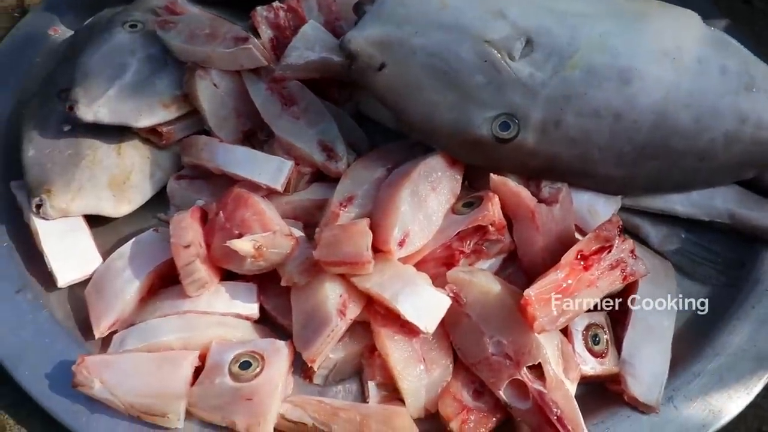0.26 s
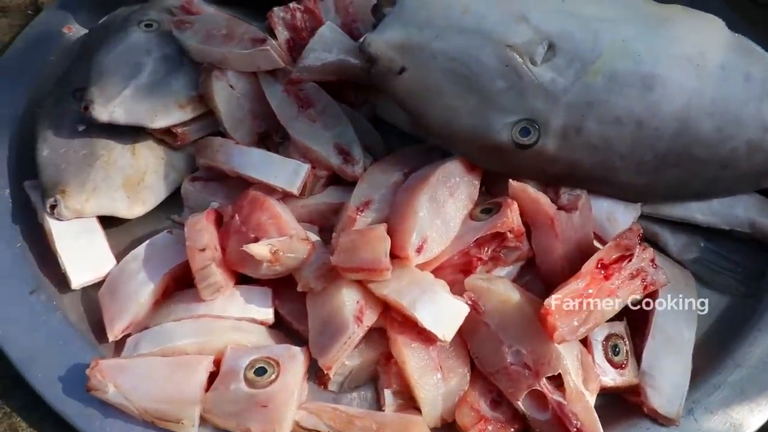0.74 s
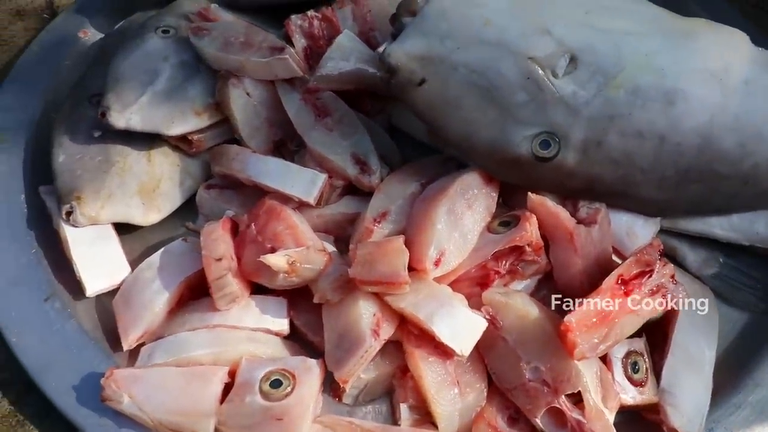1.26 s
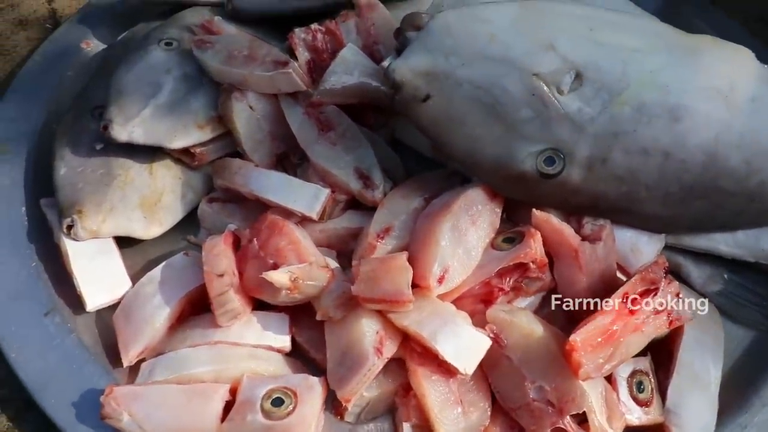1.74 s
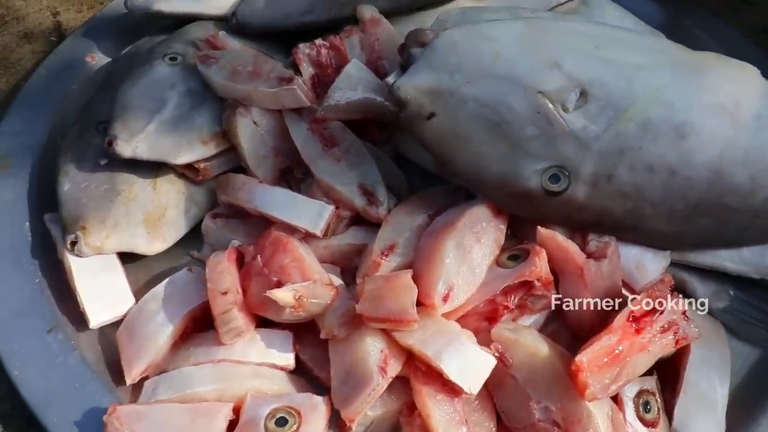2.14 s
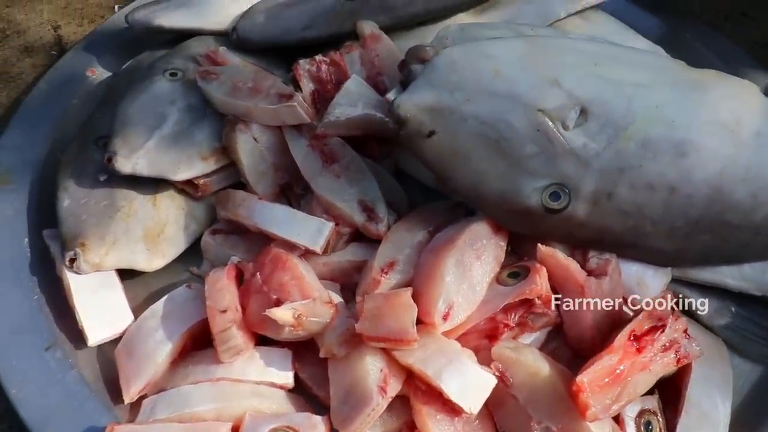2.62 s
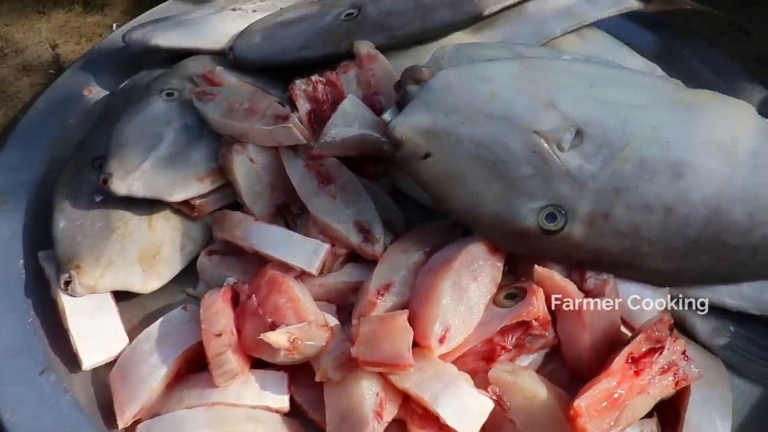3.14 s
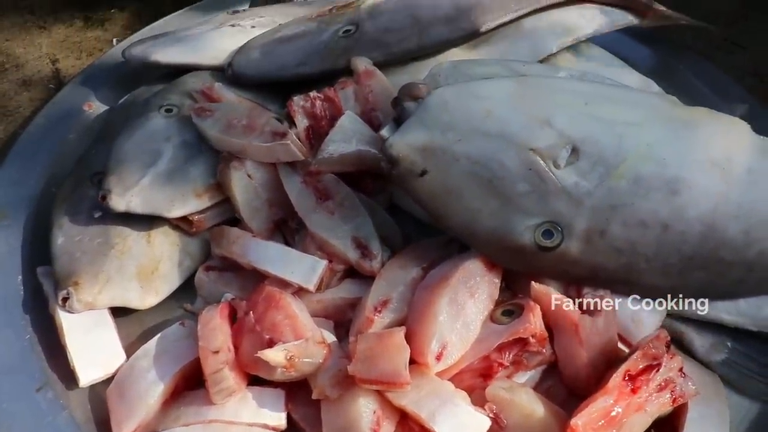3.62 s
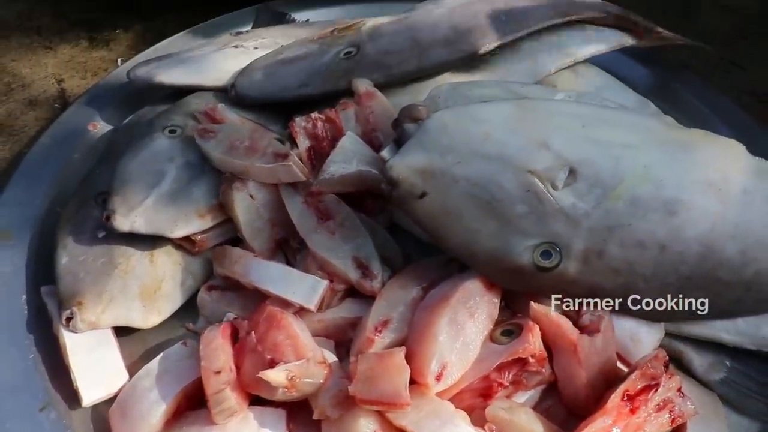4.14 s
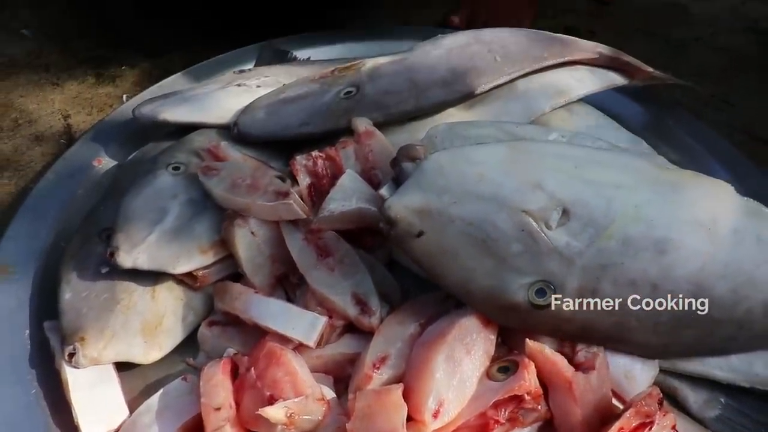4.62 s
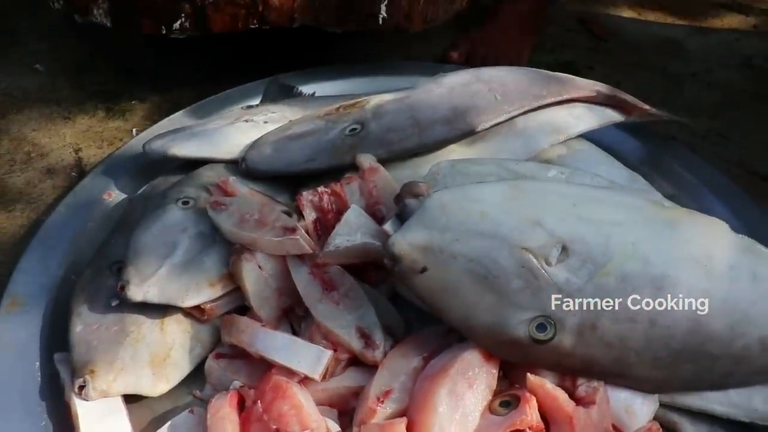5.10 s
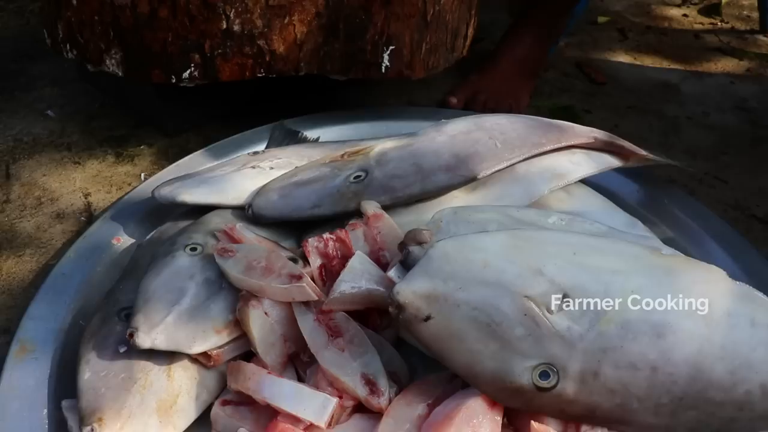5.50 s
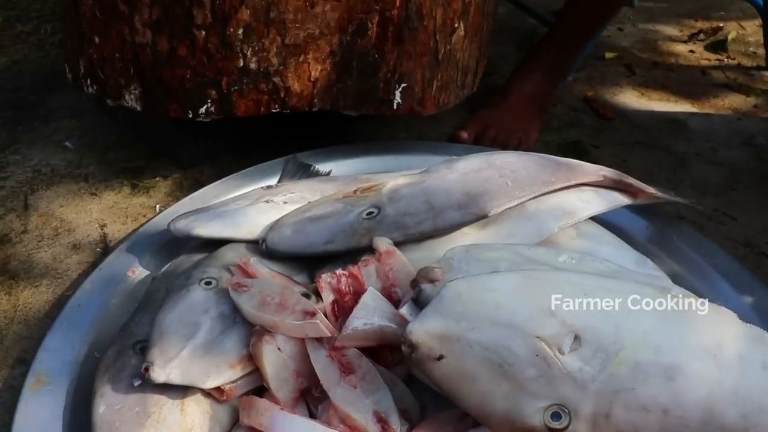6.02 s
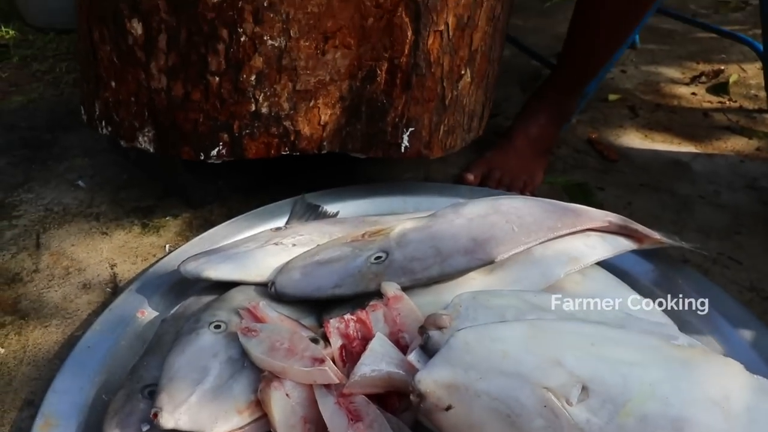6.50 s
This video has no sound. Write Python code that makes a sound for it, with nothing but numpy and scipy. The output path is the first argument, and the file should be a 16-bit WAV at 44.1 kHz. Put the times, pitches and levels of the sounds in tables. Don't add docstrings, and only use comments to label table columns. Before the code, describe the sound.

Outdoors, bright double chirps and lower warbled whistles ring over short blade scrapes on stone, abrupt knocks on wood, and soft breeze.

```python
import sys
import numpy as np
from scipy import signal
from scipy.fft import rfft, irfft
from scipy.io import wavfile
from scipy.ndimage import uniform_filter1d

SR = 44100
rng = np.random.default_rng(int(sys.argv[2]) if len(sys.argv) > 2 else 0)


def invert_db(x):
    u = np.asarray(x, float) / 20
    return 10 ** u


def generate_wav(signal):
    frames = np.transpose(np.atleast_2d(signal))
    scaled = np.clip(frames, -1, 1) * 32767
    pcm = np.round(scaled).astype(np.int16)
    wavfile.write(sys.argv[1], SR, pcm)


N = 297662

# f/Hz, density/dB per Hz
AIR_SPECTRUM = [(18, -38), (30, 6), (178, -12), (470, -19.5), (5370, -30), (6120, -25.5), (7170, -36),
                (8840, -36.5), (15700, -39.5)]
# f/Hz, width/Hz, level/dB
INSECT_BANDS = [
    (6200, 230, -82),
    (8900, 270, -71),
    (925, 51, -74.5),
    (52.6, 42, -66.5),
    (117, 4.6, -68),
    (165.7, 3.1, -65.5),
]

# t/s, length/s, f/Hz, level/dB
CHEEP_NOTES = [(0.0, 0.066, 3970, -51.5), (1.432, .12, 4040, -34), (1.8, 0.077, 4017, -31.5),
               (2.39, 0.11, 3940, -42), (2.57, .08, 3890, -34.5), (2.875, 0.087, 3966, -29),
               (3.4, .07, 3850, -40.5), (6.292, .12, 4268, -28.5)]
TWITTER_NOTES = [(.555, 0.03, 3420, -62), (.875, 0.057, 2940, -54), (1.365, 0.0089, 2780, -67),
                 (1.385, 0.011, 2800, -65)]
SQUEAK_NOTES = [(6.44, .1, 2400, -42.5)]
CLUCK_NOTES = [(2.47, 0.026, 2700, -46), (4.905, .02, 3906, -46.5), (5.397, 0.023, 3540, -43.5)]
COO_NOTES = [(1.95, 0.14, 649, -52.5), (2.88, 0.069, 593.6, -48), (2.955, 0.028, 771, -44),
             (3.28, 0.054, 576, -46.5), (6.47, 0.13, 691.5, -45)]
WARMUP_NOTES = [(3.0, 0.069, 929.3, -40.5), (3.12, .125, 1291, -29)]

CHEEP_SHAPE = [(0, .97, -20), (.18, 1, 0), (.5, 1, -8), (1, .99, -28)]
TWITTER_SHAPE = [(0, .97, -14), (.6, 1, 0), (1, .99, -4)]
SQUEAK_SHAPE = [(0, .87, -9), (.12, 1, 0), (.45, 1.01, -10), (1, 1, -27)]
CLUCK_SHAPE = [(0, .92, -8), (.3, 1, 0), (1, 1.05, -8)]
COO_SHAPE = [(0, 1.03, -10), (.3, 1, 0), (.7, .995, -3), (1, 1.01, -12)]
WARMUP_SHAPE = [(0, 1, -4), (.35, 1, 0), (.7, .93, -2), (1, .8, -9)]

# crest t/s, opening f/Hz, dip f/Hz, crest f/Hz, level/dB
WARBLES = [(3.452, 1075, 1080, 1431, -19.5), (3.782, 1290, 1240, 1506, -18),
           (4.12, 1290, 1185, 1519, -20.5), (4.439, 1385, 1265, 1558, -18.5), (5.0, 1450, 1235, 1566, -20),
           (5.752, 1500, 1240, 1598, -16)]
# t/s, first arch f/Hz, dip f/Hz, second arch f/Hz, level/dB
CHIRPS = [(2.489, 2100, 2060, 2300, -18), (2.735, 2650, 2135, 2553, -15.5),
          (2.986, 2725, 2164, 2677, -14.5), (3.255, 2790, 2207, 2756, -14), (3.513, 2738, 2221, 2810, -14),
          (3.735, 2782, 2611, 2735, -13), (3.95, 2834, 2650, 2783, -14), (4.182, 2815, 2627, 2798, -12.5),
          (4.399, 2807, 2812, 2731, -17.5), (4.644, 2845, 2705, 2789, -14.5),
          (4.914, 2536, 2344, 2744, -18), (5.405, 2367, 2346, 2602, -24.5)]
# f/Hz, level/dB
THROAT = [(1500, -14), (1800, -9), (2000, 0.5), (3000, -5.5), (4300, -31.5), (5600, -29.5), (6500, -20.5),
          (8200, -34.5), (9800, -39.5), (11000, -17), (12200, -37.5), (14000, -29), (15000, -50)]

# t/s, wood level/dB, crack level/dB, thud level/dB, burst length/s
KNOCKS = [(0.956, -8.5, -12, -33, 0.0036), (0.9599, 7, 1, -39.5, 0.0065),
          (1.006, -19.5, -32.5, -31, 0.0023), (3.102, -2.5, 1.5, -6, .006), (3.135, -21, -42, -12, 0.0053),
          (3.874, -17, -30.5, -25, 0.0093), (3.962, -30, -19, -50, 0.0028), (4.445, -43, -26, -73, 0.001),
          (4.725, -61, -34, -56, 0.001), (5.86, 0, 3.5, -35, 0.0068), (5.903, -13.5, -45.5, -21, 0.0035),
          (5.931, -18.5, -28.5, -27, 0.0066), (6.019, -36, -40.5, -25, 0.0016)]
# f/Hz, level/dB, t60/s
BLOCK_MODES = [(290, -17.5, 0.065), (387.3, -15.5, 0.066), (790, -8.5, 0.016), (940.6, -0.5, 0.048),
               (1085, -3, 0.014), (1369, -1, 0.027), (1512, -3.5, 0.028), (1980, -11, 0.029),
               (2300, -2.5, 0.01), (2990, -14, .02), (4430, -8.5, 0.016)]
# f/Hz, density/dB per Hz
CRACK_SPECTRUM = [(180, -39.5), (300, -15.5), (582, -20), (895, -6), (2020, -3), (2590, 0), (7220, -9),
                  (11500, -13.5), (15700, -23.5)]
# f/Hz, density/dB per Hz
ECHO_SPECTRUM = [(120, -45.5), (200, -11), (598, -15), (970, -1.5), (1130, -12.5), (1500, -8.5),
                 (1900, -14), (2350, -9.5), (2900, -14.5), (4170, -11.5), (5200, -17), (15700, -28)]

# firmest t/s, rise/s, fall/s, rasp level/dB, weight on the stone level/dB
STROKES = [(1.479, 0.096, .1, -49.5, -4.5), (1.719, 0.1, .16, -45.5, -1), (1.945, 0.036, 0.034, -39, 0),
           (2.0, 0.037, .12, -59.5, -0.5), (2.345, .06, .08, -70.5, -7.5), (2.96, 0.13, .12, -67, 12.5),
           (3.169, 0.066, 0.28, -50.5, 2), (3.57, 0.062, .14, -50.5, 2), (3.89, 0.13, 0.088, -47.5, 2.5),
           (3.955, 0.074, .12, -40.5, 5.5), (4.239, .09, 0.13, -47, 3.5), (4.315, .05, 0.067, -52.5, -6.5),
           (4.41, .04, 0.22, -53, -5), (4.611, 0.055, 0.051, -36.5, -1.5), (4.699, 0.039, 0.07, -45.5, -18),
           (6.36, 0.091, .1, -51, -8.5), (6.46, .05, 0.13, -52, -13), (6.608, 0.083, 0.11, -44, 2),
           (6.715, .09, 0.19, -45, -2.5)]
# f/Hz, density/dB per Hz
RASP_SPECTRUM = [(1470, -19), (2500, -8), (3010, -3), (3880, 3.5), (4520, -7), (9610, -5.5), (14200, -19.5),
                 (15700, -21.5)]
# f/Hz, width/Hz, level/dB
STEEL_MODES = [(2490, 36, -8.5), (2650, 23, -1), (3130, 30, -4.5), (3990, 54, -3.5), (4326, 71, -1.5),
               (4900, 65, -9.5), (5490, 22, -6.5), (6500, 150, -5.5), (7690, 64, -13.5), (8336, 64, -1.5),
               (9310, 150, -7)]
# t/s, level/dB
LIFTS = [
    (1.944, 13.5),
    (4.61, 2.5),
]

AIR_DB = -55
LEAD_S, LEAD_DB = .018, -13
CHIRP_S, CHIRP_HOARSE, WARBLE_HOARSE = .08, .2, .8
OPENS_S, HOLDS_S, DIPS_S, SLIDES_S = .12, .095, .055, .085
SLIDE_RATIO = .68
OPEN_DB, HOLD_DB, DIP_DB, SLIDE_DB, END_DB = -28, -6, -7, -2.5, -21.5
EDGE_DB, ROUNDNESS = -23, 2.2
JUDDER_DB, JUDDER_PER_S = 1, 30
PATCH_DB, PATCH_PER_S = 3, 22
RING_DB, STONE_DB, HUM_DB, PRESSED_T60_S = 4, -23, -14.5, .02
BODY_POWER = 0.67


def level(x, db=0):
    return x * invert_db(db) / np.sqrt(np.mean(x ** 2))


def colour(x, points):
    hz, db = np.transpose(points)
    log_f = np.log(np.arange(len(x) // 2 + 1) * SR / len(x) + 1)
    return irfft(rfft(x) * invert_db(np.interp(log_f, np.log(hz), db)), len(x))


def above(x, hz):
    return signal.sosfilt(signal.butter(4, hz, "high", fs=SR, output="sos"), x)


def band(x, low_hz, high_hz):
    return signal.lfilter(*signal.butter(2, [low_hz, high_hz], "band", fs=SR), x)


def ring(x, hz, t60):
    pole = np.exp(2j * np.pi * hz / SR - np.log(1000) / (t60 * SR))
    return signal.lfilter([1], [1, -pole], x).imag


def walk(rate):
    k = int(SR / rate)
    steps = np.repeat(rng.standard_normal(N // k + 1), k)
    return level(uniform_filter1d(steps, k)[:N])


def trees(x, t60, wet_db, damp_hz):
    t = np.arange(SR) / SR
    noise = rng.standard_normal(SR)
    low = signal.lfilter(*signal.butter(1, damp_hz, fs=SR), noise)
    fall = np.exp(-np.log(1000) * t / t60)
    tail = (low * fall + (noise - low) * fall ** 1.14) * np.minimum(t / 0.0027, 1)
    return x + invert_db(wet_db) * signal.fftconvolve(x, tail / np.linalg.norm(tail))[:N]


def notes(rows, shape):
    return [[(s + u * length, hz * ratio, db + swell) for u, ratio, swell in shape]
            for s, length, hz, db in rows]


def play(tables, fade_s):
    t = np.arange(N) / SR
    s, *columns = np.transpose(np.concatenate(tables))
    gate = sum(np.clip(np.minimum(t - c[0][0], c[-1][0] - t) / fade_s + 1, 0, 1) for c in tables)
    return np.minimum(gate, 1), *(np.interp(t, s, c) for c in columns)


def whistle(tables, overtones_db, wobble, fade_s, flutter_db=3.5, hoarse=.05):
    gate, hz, db = play(tables, fade_s)
    phase = 2 * np.pi * np.cumsum(hz * (1 + wobble * walk(150))) / SR
    turbulence = hoarse * walk(900)
    tone = sum(invert_db(o) * (1 + k * turbulence) * np.sin((k + 1) * phase) for k, o in enumerate(overtones_db))
    return np.sqrt(2) * gate * invert_db(db + flutter_db * walk(70)) * tone


def air():
    wide = level(colour(rng.standard_normal(N), AIR_SPECTRUM), AIR_DB)
    rumble = signal.lfilter(*signal.butter(2, 300, fs=SR), wide)
    hiss = wide - rumble
    bugs = sum(level(ring(rng.standard_normal(N), hz, 2.2 / width), db) * invert_db(1.5 * walk(6))
               for hz, width, db in INSECT_BANDS)
    return rumble * invert_db(3.3 * walk(3.3)) + hiss * invert_db(-0.5 + 0.99 * walk(3.3)) + bugs


def far_birds():
    cheeps = whistle(notes(CHEEP_NOTES, CHEEP_SHAPE), [-3, -8, -34],
                     wobble=.01, fade_s=.004, flutter_db=2.2, hoarse=.3)
    twitter = whistle(notes(TWITTER_NOTES, TWITTER_SHAPE), [-3], wobble=.045, fade_s=.01)
    squeak = whistle(notes(SQUEAK_NOTES, SQUEAK_SHAPE), [-24.5, 5, 3.5, 5.0], wobble=0.0066, fade_s=0.013)
    clucks = whistle(notes(CLUCK_NOTES, CLUCK_SHAPE), [0], wobble=.03, fade_s=.002) * walk(1200)
    doves = whistle(notes(COO_NOTES, COO_SHAPE), [-3, -18], wobble=0.027, fade_s=.015)
    return trees(cheeps + twitter + squeak + clucks + doves, t60=.5, wet_db=-0.5, damp_hz=6000)


def warbles():
    return [[(s - OPENS_S, opening, db + OPEN_DB), (s - HOLDS_S, opening, db + HOLD_DB),
             (s - DIPS_S, dip, db + DIP_DB),
             (s - .01, crest, db), (s + .012, crest, db),
             (s + .6 * SLIDES_S, .8 * crest, db + SLIDE_DB),
             (s + SLIDES_S, SLIDE_RATIO * crest, db + END_DB)] for s, opening, dip, crest, db in WARBLES]


def whistler():
    calls = notes(WARMUP_NOTES, WARMUP_SHAPE) + warbles()
    voice = whistle(calls, [-2.5, -51.5, -57.5, -55.5, -54.5],
                    wobble=0.0055, fade_s=0.0021, flutter_db=3.0, hoarse=WARBLE_HOARSE)
    return trees(voice, t60=0.46, wet_db=-3, damp_hz=5060)


def chirper():
    u = np.linspace(0, 1, 33)
    calls = []
    for s, first, dip, second, db in CHIRPS:
        start = min(2270, 1.1 * first)
        pitch = np.interp(u, [0, .08, .18, .38, .52, .66, .86, .93, 1],
                          [start, start, first, first, dip, second, second, 0.76 * second, .62 * second])
        pitch = uniform_filter1d(pitch, size=3, mode="nearest")
        swell = db + np.interp(u, [0, .06, .8, .9, 1], [-10, -2.5, -3, -13.5, -24])
        calls.append(np.transpose([s + u * CHIRP_S, pitch, swell]))
    voice = whistle(calls, np.zeros(6), wobble=.006, fade_s=0.00028, flutter_db=3.5, hoarse=CHIRP_HOARSE)
    voice = colour(voice, THROAT)
    overtones = above(voice, 3610)
    body = trees(voice - overtones, t60=0.44, wet_db=0.5, damp_hz=5340)
    return body + invert_db(-11.5) * trees(overtones, t60=0.35, wet_db=8.5, damp_hz=9000)


def chops():
    t = np.arange(4096) / SR
    out, blows = np.zeros(N + len(t)), np.zeros(N)
    chance = rng.standard_normal((len(KNOCKS), len(t)))
    thud = np.sin(2 * np.pi * 65 * t) * np.exp(-t / 0.002) * np.minimum(t / 0.0025, 1)
    for (s, wood_db, crack_db, thud_db, length), noise in zip(KNOCKS, chance):
        shape = np.minimum(t / 0.0027, 1) * np.exp(-(t / length) ** 2)
        crack = 0.82 * level(colour(noise, CRACK_SPECTRUM)) * shape
        wood = sum(invert_db(db) * ring(noise * shape, hz * (1 + 0.017 * detune), t60)
                   for (hz, db, t60), detune in zip(BLOCK_MODES, noise[::-1]))
        wood = above(wood, 240)
        wood = wood / np.abs(wood).max()
        i = int(s * SR)
        out[i:i + len(t)] += invert_db(crack_db) * crack + invert_db(wood_db) * wood + invert_db(thud_db) * thud
        blows[i] = invert_db(crack_db) * length / 0.0056
    fall = signal.lfilter([1], [1, -np.exp(-np.log(1000) / (.6 * SR))], blows)
    swell = uniform_filter1d(np.roll(fall, 300), 400)
    wash = level(colour(rng.standard_normal(N), ECHO_SPECTRUM), -34.5) * swell
    return trees(out[:N], t60=.25, wet_db=-20, damp_hz=4000) + wash


def pressure():
    s, rise, fall, db, weight_db = np.transpose(STROKES)[:, :, None]
    t = np.arange(N) / SR - s
    distance = np.where(t < 0, -t / rise, t / fall)
    force = invert_db(db + EDGE_DB * distance ** ROUNDNESS + JUDDER_DB * walk(JUDDER_PER_S))
    return force.sum(axis=0), (invert_db(weight_db) * force ** BODY_POWER).sum(axis=0)


def grit():
    return level(rng.standard_normal(N) * invert_db(2.5 * rng.exponential(size=N) + 1.8 * walk(120)))


def patchy(x):
    spectrum = rfft(x)
    octave = np.log2(np.arange(len(x) // 2 + 1) * SR / len(x) / 1000 + 1e-9)
    octave = np.clip(octave, .5, 3.5)
    tents = (np.clip(1 - 2 * np.abs(octave - k / 2), 0, 1) for k in range(1, 8))
    return sum(irfft(spectrum * tent, len(x)) * invert_db(PATCH_DB * walk(PATCH_PER_S)) for tent in tents)


def blade():
    force, body = pressure()
    push = grit() * force
    rasp = np.sqrt(np.mean(push ** 2)) * level(patchy(colour(push, RASP_SPECTRUM)), 6.06)
    pressed = sum(invert_db(db) * ring(push * invert_db(RING_DB), hz, PRESSED_T60_S) for hz, width, db in STEEL_MODES)
    lift = sum(invert_db(db) * np.exp(-((np.arange(N) / SR - s) / 0.01) ** 2) for s, db in LIFTS)
    free = sum(invert_db(db) * np.sqrt(width) * ring(push * lift, hz, 3.5 / (width + 25))
               for hz, width, db in STEEL_MODES)
    steel = above(invert_db(-28.5) * pressed + invert_db(-42.5) * free, 1900)
    stone = band(grit() * body * invert_db(STONE_DB), 450, 1200)
    hum = band(grit() * body * invert_db(HUM_DB), 1200, 2600)
    return trees(rasp + steel + invert_db(13) * stone + invert_db(13.0) * hum, t60=0.23, wet_db=-6.0, damp_hz=4000)


def scene():
    near = far_birds() + whistler() + chirper() + chops() + blade()
    early = np.roll(near, -int(LEAD_S * SR))
    early = signal.lfilter(*signal.butter(1, 400, "high", fs=SR), early)
    return (near + invert_db(LEAD_DB) * early + air())[None]


def top_cut(x):
    return signal.sosfilt(signal.butter(12, 15880, fs=SR, output="sos"), x)


def record(dry):
    heard = above(dry, 48)
    heard = np.clip(heard, -.98, .98)
    heard = signal.sosfilt(signal.ellip(8, .2, 50, 15900, fs=SR, output="sos"), heard)
    return top_cut(heard)


dry = scene()
out = record(dry)
generate_wav(out)
```